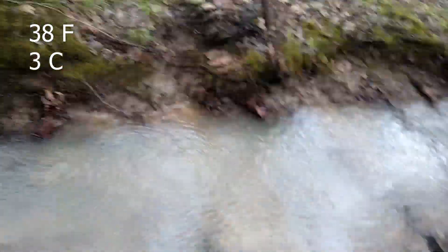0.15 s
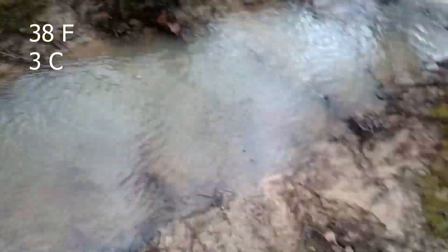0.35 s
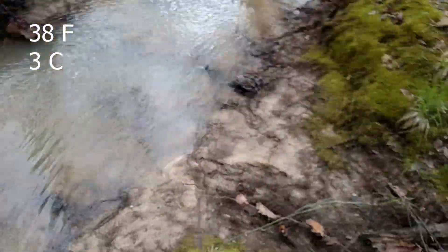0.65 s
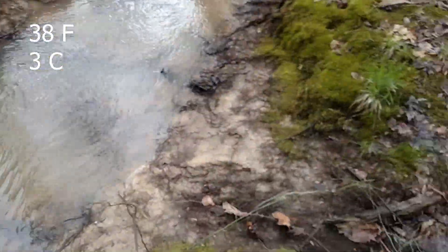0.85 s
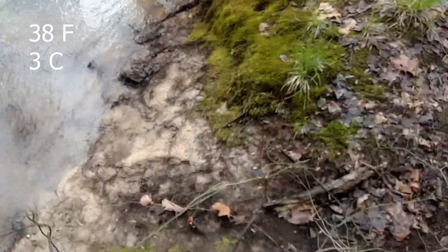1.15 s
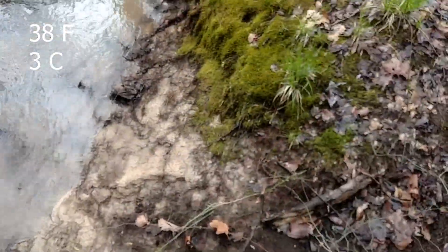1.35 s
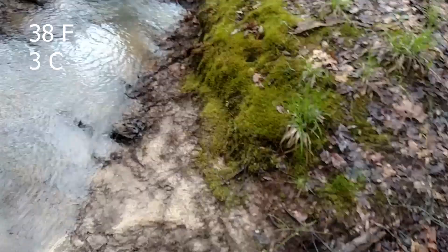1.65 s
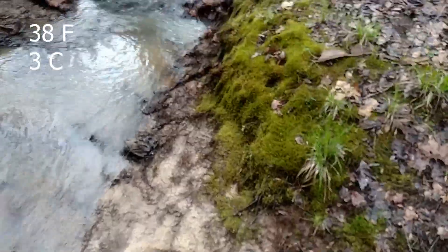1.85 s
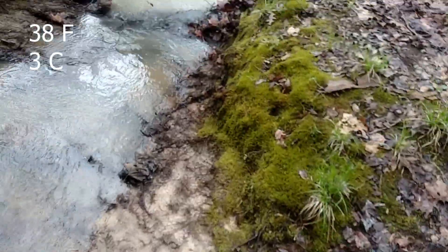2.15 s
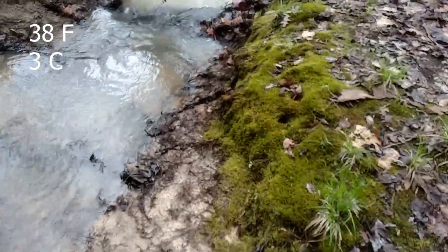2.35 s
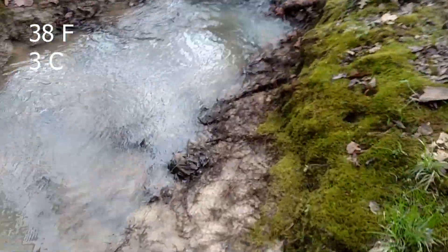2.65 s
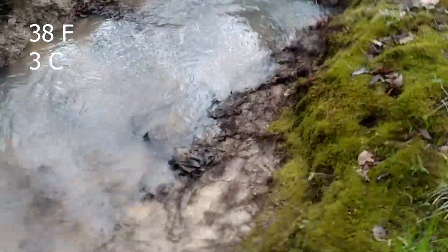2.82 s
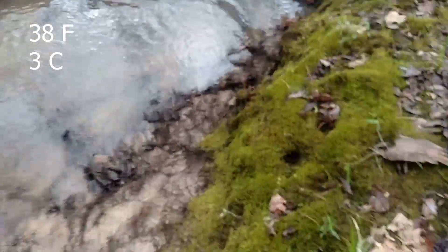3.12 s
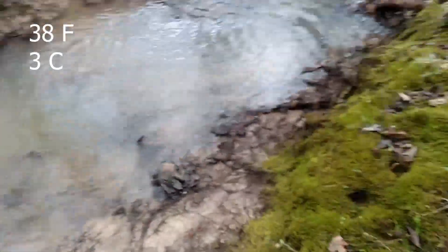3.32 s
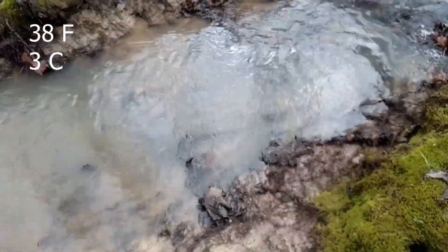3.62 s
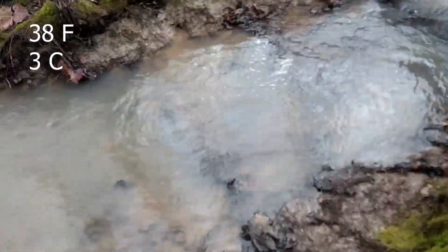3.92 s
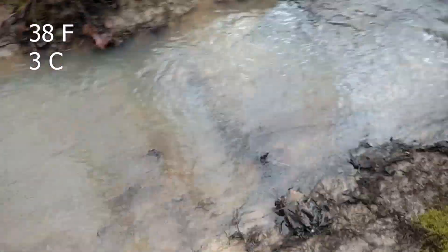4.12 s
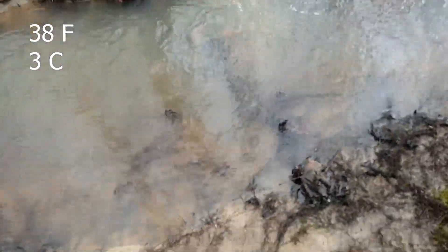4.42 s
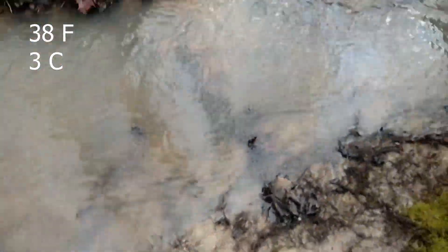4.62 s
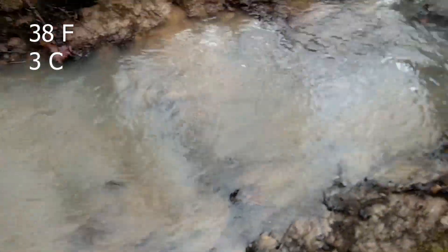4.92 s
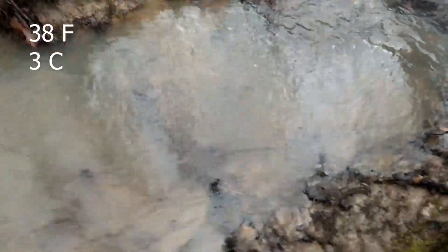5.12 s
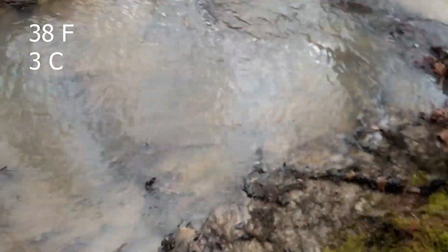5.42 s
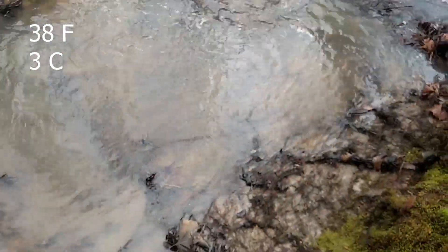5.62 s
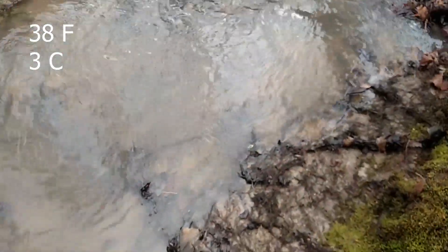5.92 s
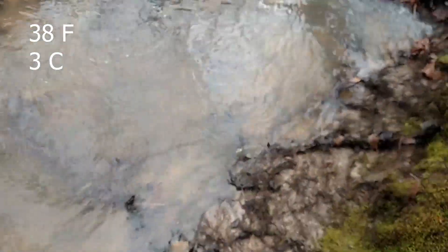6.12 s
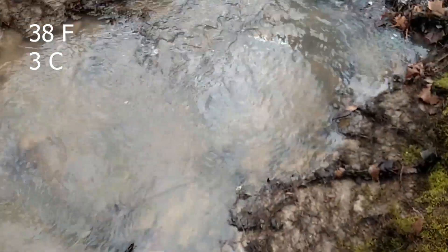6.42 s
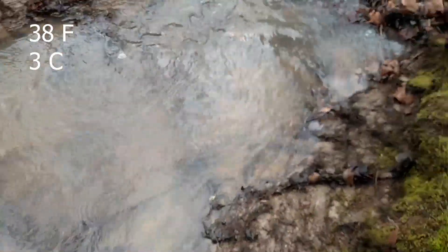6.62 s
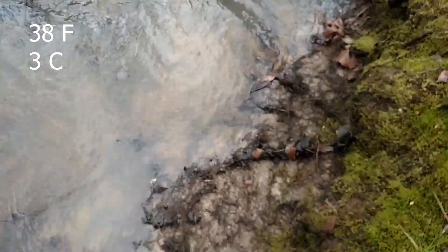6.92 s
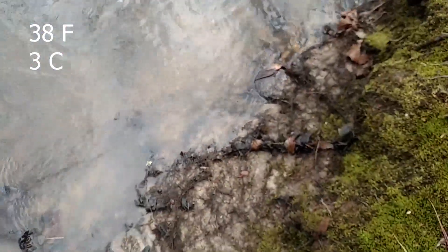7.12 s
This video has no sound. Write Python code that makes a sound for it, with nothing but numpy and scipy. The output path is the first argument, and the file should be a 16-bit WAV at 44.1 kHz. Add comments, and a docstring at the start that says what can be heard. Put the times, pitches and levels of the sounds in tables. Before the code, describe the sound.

Small stream trickling and fizzing close by, early twig cracks underfoot, low wind thuds midway, then busier plinking and spattering drops.

```python
"""A shallow creek babbles over stones: countless small ringing bubbles over a wash of flickering noise.
Nearer bubbles plink out of it, more often as the hand-held microphone leans from the leafy bank over the
water; there ticking noise bursts make more drops, and a dulled echo and moving resonances tint the stream.
Short cracks and damped knocks are twigs, grainy noise is leaves stirred and slid on underfoot.
A low noise rumbles throughout, and in the middle a few gusts thump as dull pressure pulses."""
import sys
import numpy as np
from scipy import signal
from scipy.fft import rfft, irfft
from scipy.io import wavfile
from scipy.ndimage import uniform_filter1d

SR = 44100
rng = np.random.default_rng(int(sys.argv[2]) if len(sys.argv) > 2 else 0)


def persist_wave(psi):
    """Save psi, clipped to +-1, as 16-bit WAV."""
    counts = np.round(np.clip(psi, -1, 1) * 32767).astype(np.int16)
    wavfile.write(sys.argv[1], SR, np.atleast_2d(counts).T)


N = 320166
TIME = np.arange(N) / SR  # [s]

# level of the babble and of the spray over time, before each layer's trim:
# (time [s], babble level [dB], spray level [dB])
WATER_LEVELS = [(0.0, -51.5, -66), (0.5, -52.5, -67), (1.2, -53.5, -65), (2.05, -53, -63.5),
                (2.6, -53, -64.5), (3.05, -48.5, -60), (3.8, -49.5, -61.5), (4.35, -53, -66.5),
                (5.13, -52, -64), (6.91, -51, -62), (7.26, -52, -59.5)]
# relative loudness of the small bubbles by pitch: (pitch [Hz], level [dB])
BUBBLE_LOUDNESS = [(500, -12), (800, -4.5), (1200, -2), (1800, 2.5), (2600, -3.5), (4000, 11.5), (6000, 9),
                   (9000, -1), (14000, -23)]
# near bubbles at set times, before trim: (time [s], pitch [Hz], peak level [dB])
NEAR_BUBBLES = [(1.145, 2030, -40.5), (1.269, 1460, -42.5), (1.351, 1470, -43), (1.630, 1280, -40.5),
                (1.76, 1174, -40), (1.968, 1560, -42.5), (1.992, 1770, -39), (2.112, 1760, -38),
                (2.252, 845, -41.5), (2.783, 1720, -35.5), (2.933, 2000, -36), (3.027, 1620, -30.5),
                (3.567, 1510, -40), (4.254, 2000, -39.5), (4.48, 1530, -44), (4.57, 1740, -44),
                (4.63, 2170, -46), (4.951, 1560, -35.5), (5.024, 2010, -36.5), (5.034, 2970, -35),
                (5.086, 1440, -40.5), (5.15, 1690, -43.5), (5.24, 1510, -43), (5.358, 950, -36),
                (5.391, 1320, -37), (5.45, 2510, -45.5), (5.5192, 1600, -40), (5.547, 1900, -45),
                (5.763, 1960, -38.5), (5.836, 2530, -39.5), (5.849, 1005, -42.5), (5.917, 2000, -42),
                (6.944, 2510, -37)]
# near drops at set times, before trim: (time [s], peak level [dB], centre [Hz])
NEAR_DROPS = [(1.056, -30, 1640), (1.148, -40, 2100), (1.281, -38, 2650), (1.573, -31.5, 3610),
              (2.816, -28.5, 1477), (4.524, -42, 5000), (4.824, -32.5, 3550), (5.043, -38, 4300),
              (5.044, -48, 9000), (5.209, -48, 12000), (5.239, -47, 10000), (5.255, -48, 11500),
              (5.5663, -31, 3000), (5.808, -32, 3260), (5.9255, -30, 3100), (6.024, -39, 7260),
              (6.046, -35, 5660), (6.084, -35.5, 4130), (6.1374, -31, 5600), (6.14, -31, 1540),
              (6.189, -30.5, 1510), (6.351, -45, 6100), (6.395, -37.5, 6000), (6.5765, -35, 6100),
              (6.587, -30.5, 5300), (6.741, -36, 5110)]
# colour of the blended wash of the whole stream: (frequency [Hz], level [dB per Hz])
WASH_COLOUR = [(120, -24), (200, -3.5), (394, -7.5), (635, -5), (735, -4), (1210, -3), (1840, -5),
               (2510, -3), (5730, -20), (14900, -32.5), (16000, -39)]
# the echo off the water as the microphone moves over it: (time [s], delay [ms], strength [0-1])
WATER_ECHO = [(4.3, 0.54, 0.24), (5.2, 0.66, 0.1), (5.6, 1.14, 0.26), (5.9, 1.03, 0.2), (6.7, 1.074, 0.33),
              (7.26, 1.21, 0.27)]
# a narrow band that stands out over the water: (time [s], centre [Hz], boost [0-1])
BRIGHT_BAND = [(4.6, 6700, 0.03), (5.05, 6440, 0), (5.4, 5800, 0.3), (5.7, 5750, 0.9), (6.05, 5860, 1),
               (6.3, 5400, 0), (6.8, 5330, 0.9), (7.26, 5070, 0)]
# twigs and dry leaves snapping, before trim: (time [s], peak level [dB], knock pitch [Hz],
# crack level relative to the knock [dB], splinter pitch [Hz])
TWIG_SNAPS = [(0.0307, -27.5, 875, -2.5, 6200), (0.039, -26.5, 784, -12, 2000),
              (0.1252, -28.5, 880, -8.5, 6280), (.204, -34, 1110, -9, 2500),
              (0.2231, -19.5, 974, -9.5, 7800), (0.6133, -29, 1300, 1, 3470), (.917, -33, 1400, -9, 2620),
              (1.847, -29.5, 1080, -22, 2030), (1.871, -23, 1080, -19, 1500), (4.1056, -43, 595, 0, 9400),
              (5.2885, -32.5, 960, -11, 3000), (5.2959, -32.5, 700, -5.5, 1700),
              (5.4955, -28.5, 556, -20, 2200), (5.982, -28.5, 660, -12, 2500)]
# colour of a snap's sharp crack: (frequency [Hz], level [dB])
CRACK_COLOUR = [(500, -15), (1500, 31), (3500, 1), (7000, 11), (10000, -12), (16000, -26)]
# shoes shifting in damp leaves: (middle [s], length [s], level [dB])
LEAF_SHUFFLES = [(0.013, 0.03, -38), (0.328, 0.096, -51), (0.944, 0.23, -50.5), (1.666, 0.071, -51),
                 (2.649, 0.016, -49), (2.848, 0.079, -42), (2.945, 0.053, -40), (3.129, 0.051, -43),
                 (3.87, 0.15, -52.5), (4.156, 0.021, -45), (4.67, 0.19, -51), (5.314, 0.067, -48),
                 (5.492, 0.036, -54), (6.885, 0.094, -51)]
# colour of the leaf rustle: (frequency [Hz], level [dB per Hz])
LEAF_COLOUR = [(150, -27), (350, 7.5), (800, 7.5), (1500, 4.5), (3000, -5.5), (7000, -13.5), (10000, -22.5),
               (16000, -36)]
# gusts on the microphone, before trim: (peak time [s], buffeting level [dB])
GUST_PEAKS = [(2.79, -41.5), (2.848, -32), (2.985, -34), (3.182, -43.5), (3.29, -51), (3.44, -33),
              (3.809, -38), (3.93, -42.5), (4.045, -33.5)]
# eddies striking the microphone at set times, strong and weak: (time [s], peak level [dB], centre [Hz])
SET_EDDIES = [(0.166, -34, 126), (0.288, -34.5, 128), (0.934, -33.5, 188), (1.899, -44, 224),
              (2.068, -27, 176), (2.096, -31, 180), (2.162, -38.5, 320), (2.2, -34.5, 180),
              (2.853, -10.5, 230), (2.8585, -18, 280), (2.867, -15.5, 170), (2.881, -28, 250),
              (2.895, -21, 310), (2.91, -13, 172), (3.015, -31, 141), (3.175, -34.5, 131),
              (3.194, -43, 178), (3.391, -32, 106), (3.439, -12, 164), (3.4404, -23, 315),
              (3.467, -21, 154), (3.519, -33, 169), (3.605, -39, 63.8), (3.833, -38, 85),
              (3.781, -27.5, 248), (3.992, -27.5, 160.7), (4.015, -32, 252), (4.043, -23.5, 94),
              (4.052, -27, 258), (4.064, -19.5, 130), (4.141, -32, 300), (4.174, -33.5, 128),
              (4.447, -41.5, 97), (5.229, -41, 104), (6.145, -35, 172), (6.251, -38.5, 90),
              (6.548, -39, 130)]
# colour of the buffeting in a gust: (frequency [Hz], level [dB per Hz])
GUST_COLOUR = [(12, -18), (22, 5), (55, 4), (125, 6), (310, -28), (560, -32), (800, -55), (1300, -100)]
# level of the low rumble, before trim: (time [s], level [dB])
RUMBLE_LEVEL = [(0.0, -54.5), (0.5, -51), (1.35, -59), (2.2, -53), (2.55, -52), (3.3, -62), (4.6, -53.5),
                (5.85, -57.5), (6.25, -53.5), (7.26, -55.5)]
# colour of the rumble in calm air: (frequency [Hz], level [dB per Hz])
CALM_COLOUR = [(12, -11), (20, 2.5), (38, -3), (118, -1), (176, -3.5), (212, -4.5), (370, -11.5),
               (600, -16), (780, -63), (1320, -120)]


def gain_of(db):
    """Decibels to amplitude."""
    return 10 ** (np.asarray(db) / 20)


def evened(x):
    """Scales to rms 1."""
    return x / np.sqrt(np.mean(x ** 2) + 1e-20)


def read(points, hz):
    """Reads a spectrum on a log-frequency axis."""
    f, value = np.transpose(points)
    return np.interp(np.log(hz + 1), np.log(f + 1), value)


def follow(rows, axis):
    """One column of a curve at every sample."""
    columns = np.transpose(rows)
    return np.interp(TIME, columns[0], columns[axis])


def add(mix, s, sound):
    """Mixes a sound in at time s."""
    part = mix[max(round(s * SR), 0):][:len(sound)]
    part += sound[:len(part)]


def coloured(x, spectrum):
    """Gives a signal a spectrum, at rms 1."""
    gain = gain_of(read(spectrum, np.fft.rfftfreq(len(x), 1 / SR)))
    return evened(irfft(rfft(x) * gain, len(x)))


def drift(top_hz):
    """A smooth random wander of rms 1: noise kept only below top_hz."""
    noise = rfft(rng.standard_normal(N))
    return evened(irfft(noise * (np.fft.rfftfreq(N, 1 / SR) < top_hz), N))


def moments(per_s):
    """Random events at a changing rate: rows of (time [s], two chance values [0-1])."""
    due = np.cumsum(per_s * np.ones(N)) / SR  # events expected so far
    when, one, other = rng.random((int(due[-1]), 3)).T
    return zip(np.interp(when * due[-1], due, TIME), one, other)


def leaning(middle_s=4.7, takes_s=0.38):
    """How far the microphone is out over the water, 0 to 1, on a smooth S-curve."""
    return 0.5 + 0.5 * np.tanh((TIME - middle_s) / takes_s)


def bubble(hz, t60, rise):
    """A trapped air pocket rings and dies; a positive rise lifts its pitch as it nears the surface."""
    t = np.arange(int(t60 * SR) + 8) / SR
    turns = hz * (t + rise * t ** 2 / (2 * t60))
    attack = 1 - np.exp(-t * hz)
    decay = gain_of(-60 * (t / t60) ** 1.56)
    return np.sin(2 * np.pi * turns) * attack * decay


def swarm(lo_hz, hi_hz, per_s, cycles, spread_db, rise, count=48):
    """Bubbles of many sizes burst in clusters as wavelets fold over; most are faint, a few loud."""
    pitches = np.geomspace(lo_hz, hi_hz, count)
    rings = [bubble(hz, cycles / hz * rng.uniform(0.58, 2.16), rise * rng.uniform(-0.23, 1.55))
             for hz in pitches]
    # a wandering rate clusters the bursts
    due = np.cumsum(gain_of(3.5 * drift(14))) * per_s / SR
    when, kind, luck = rng.random((int(due[-1]), 3)).T
    starts = np.searchsorted(due, when * due[-1])
    kinds = (kind * count).astype(int)
    lucky_db = spread_db * np.minimum(-np.log(1 - luck), 3.8)
    sizes = gain_of(read(BUBBLE_LOUDNESS, pitches)[kinds] + lucky_db)
    out = np.zeros(N + SR)
    for i, k, size in zip(starts.tolist(), kinds.tolist(), sizes.tolist()):
        out[i:i + len(rings[k])] += size * rings[k]
    return out[:N] / np.std(out[:N])


def babble(gurgle_db=-3.5, trickle_db=-13.5, fizz_db=0.0, bank_db=-2.0):
    """Large bubbles gurgle, middling ones trickle, tiny ones fizz; all are softer from the bank."""
    gurgle = swarm(lo_hz=607.2, hi_hz=2306, per_s=850, cycles=24.5, spread_db=5.5, rise=0.14)
    trickle = swarm(lo_hz=1409, hi_hz=3317, per_s=450, cycles=34, spread_db=8.5, rise=0.22)
    fizz = swarm(lo_hz=3236, hi_hz=12750, per_s=1400, cycles=19.6, spread_db=5.0, rise=0.084)
    body = gain_of(gurgle_db) * gurgle + gain_of(trickle_db) * trickle
    body = body * gain_of(follow(WATER_LEVELS, axis=1))
    fizz = fizz * gain_of(follow(WATER_LEVELS, axis=2) + fizz_db)
    return (body + fizz) * gain_of(bank_db * (1 - leaning()))


def burble(middle_s=1.74, length_s=1.18, level_db=-56.5):
    """For a while one ripple sheds a run of bubbles of nearly one size."""
    run = swarm(lo_hz=1137, hi_hz=1756, per_s=310, cycles=53, spread_db=2.0, rise=0.13, count=16)
    swell = np.exp(-(2 * (TIME - middle_s) / length_s) ** 4)
    return run * gain_of(level_db) * swell


def random_bubbles(bank_per_s=6.0, water_per_s=20.0, lo_hz=1200, hi_hz=4000,
                   top_db=-45.0, nearer_db=3.5, range_db=13.5):
    """More near bubbles at random times, most over the water: rows of (time [s], pitch [Hz], level [dB])."""
    lean = leaning()
    rows = []
    for s, size, depth in moments(bank_per_s + (water_per_s - bank_per_s) * lean):
        db = top_db + nearer_db * np.interp(s, TIME, lean) - range_db * depth
        rows.append((s, lo_hz * (hi_hz / lo_hz) ** size, db))
    return rows


def gurgles(per_s=4.0, lo_hz=1000, hi_hz=3200, top_db=-41.0, range_db=17.0,
            gap_s=0.017, step_octaves=0.25, fade_db=3.8, count=4):
    """Air pockets break into quick chains of fading bubbles: rows of (time [s], pitch [Hz], level [dB])."""
    rows = []
    for s, size, depth in moments(per_s * leaning()):
        times = s + np.cumsum(gap_s * (0.5 + rng.random(count)))
        steps = np.cumsum(step_octaves * rng.standard_normal(count))
        pitches = lo_hz * (hi_hz / lo_hz) ** size * 2 ** steps
        rows += zip(times, pitches, top_db - range_db * depth - fade_db * np.arange(count))
    return rows


def plinks(level_db=1.5, rise=0.25, start=0.97, pinch_db=-1.0, pinch_s=0.00062, rough=0.26,
           longest_cycles=42.4):
    """Near bubbles tick as they pinch off, then ring from just under pitch, shaken by the current."""
    out, t = np.zeros(N), np.arange(512) / SR
    shake = 1 + rough * drift(260)
    for s, hz, db in NEAR_BUBBLES + random_bubbles() + gurgles():
        # (frequency [Hz], level [dB])
        colour = [(hz / 2, -6), (hz, 0), (hz * 2, -7), (hz * 8, -42)]
        tick = coloured(rng.standard_normal(len(t)), colour)
        tick = tick * (1 - np.exp(-t * hz * 6)) * np.exp(-t / pinch_s)
        add(out, s, gain_of(db + pinch_db) * tick)
        # a fixed range of cycles to fall 60 dB, so large bubbles ring longer
        t60 = longest_cycles / hz * rng.uniform(0.83, 1.0)
        ring = bubble(hz * start, t60, rise * rng.uniform(-0.18, 1.84))
        add(out, s, gain_of(db + level_db) * ring)
    return out * shake


def smack(hz, decay_s, attack_s=0.0004, skirt_db=-28.0):
    """A sudden impact: a quick, very short burst of noise around one pitch."""
    t = np.arange(1024) / SR
    # (frequency [Hz], level [dB])
    colour = [(hz / 4, 2 * skirt_db), (hz / 2, skirt_db), (hz, 0), (hz * 2, skirt_db), (hz * 4, 2 * skirt_db)]
    burst = coloured(rng.standard_normal(len(t)), colour)
    return burst * (1 - np.exp(-t / attack_s)) * np.exp(-t / decay_s)


def random_drops(per_s=40.0, lo_hz=1500, hi_hz=11000, top_db=-33.5, range_db=10.0, db_per_octave=-4.5):
    """More drops at random times, over the water: rows of (time [s], peak level [dB], centre [Hz])."""
    octaves = np.log2(hi_hz / lo_hz)
    rows = []
    for s, size, depth in moments(per_s * leaning()):
        db = top_db - range_db * depth + db_per_octave * size * octaves
        rows.append((s, db, lo_hz * 2 ** (size * octaves)))
    return rows


def spatter(level_db=-4.5):
    """Near drops smack the surface one by one, each a short burst of noise."""
    out = np.zeros(N)
    for s, db, hz in NEAR_DROPS + random_drops():
        add(out, s, gain_of(db + level_db) * smack(hz, decay_s=0.0022))
    return out


def droplets(per_s=150, spread_db=5.5, level_db=-1.0, lo_hz=3300, hi_hz=11000, db_per_octave=-7.5, count=24):
    """Small flung droplets tick on the surface at many pitches, the higher ones fainter."""
    out = np.zeros(N)
    pitches = np.geomspace(lo_hz, hi_hz, count)
    ticks = [smack(hz, decay_s=0.002) * gain_of(db_per_octave * np.log2(hz / lo_hz)) for hz in pitches]
    for s, kind, luck in moments(per_s):
        lucky_db = spread_db * min(-np.log(1 - luck), 3)
        add(out, s, ticks[int(kind * count)] * gain_of(lucky_db))
    return evened(out) * gain_of(follow(WATER_LEVELS, axis=2) + level_db)


def wash(level_db=-4.5, spray_db=-2.5, patchy_db=3.0, flicker_db=2.5, far_db=-71.0):
    """Distant ripples blend into a hiss that flickers in patches, over the even fizz of farther water."""
    hz = np.fft.rfftfreq(512, 1 / SR)
    real, imaginary, patches = rng.standard_normal((3, N // 128 + 5, len(hz)))
    # smoothed over time, then over frequency
    patches = uniform_filter1d(patches, size=6, axis=0)
    patches = evened(uniform_filter1d(patches, size=7, axis=1))
    flicker = evened(uniform_filter1d(rng.standard_normal(len(real)), size=5))[:, None]
    level = read(WASH_COLOUR, hz) + patchy_db * patches + flicker_db * flicker
    frames = (real + 1j * imaginary) * gain_of(level)
    high = 1 / (1 + (3500 / (hz + 1)) ** 4)  # share of the spray; the body takes the rest
    body, spray = (evened(signal.istft((frames * share).T, nperseg=512, noverlap=384)[1][:N])
                   for share in (1 - high, high))
    # (frequency [Hz], level [dB per Hz])
    far_colour = [(300, -8), (3500, -4.5), (6500, 1.0), (10000, -10.0), (15500, -17)]
    far = coloured(rng.standard_normal(N), far_colour)
    body = body * gain_of(follow(WATER_LEVELS, axis=1) + level_db)
    spray = spray * gain_of(follow(WATER_LEVELS, axis=2) + spray_db)
    return body + spray + gain_of(far_db) * far


def resonate(x, hz, width):
    """A resonance of gain 1 that follows the curve hz: shift down, smooth, shift back."""
    turn = np.exp(2j * np.pi * np.cumsum(hz) / SR)
    r = np.exp(-np.pi * width / SR)
    return 2 * (turn * signal.lfilter([1 - r], [1, -r], x / turn + 1e-18)).real


def mirrored(x, dull_hz=3300, sheen_width_hz=560, hollow_ratio=1.16, hollow_width_hz=800, hollow=0.73):
    """The rippled surface adds a dulled echo; a bright band and a hollow just above it move in pitch."""
    dulled = irfft(rfft(x) / (1 + (np.fft.rfftfreq(N, 1 / SR) / dull_hz) ** 4), N)
    echo = np.interp(TIME - follow(WATER_ECHO, axis=1) / 1000, TIME, dulled)
    hz, boost = follow(BRIGHT_BAND, axis=1), follow(BRIGHT_BAND, axis=2)
    bright = x + boost * resonate(x, hz, sheen_width_hz)
    dip = hollow * boost * resonate(bright, hz * hollow_ratio, hollow_width_hz)
    return bright - dip + follow(WATER_ECHO, axis=2) * echo


def snaps(knock_s=0.00088, crack_s=0.0012, crack_db=3.0, knock_db=3.5, overtone=0.16,
          lowest_hz=440, splinter_db=-5.0):
    """A twig gives way: a brief crack, the sharp tick of a splinter and a damped woody knock."""
    out, t = np.zeros(N), np.arange(1024) / SR
    for s, db, hz, bright_db, splinter_hz in TWIG_SNAPS:
        splinter = smack(splinter_hz, decay_s=0.0014, attack_s=0.0001)
        add(out, s, gain_of(db + bright_db + splinter_db) * splinter)
        knock = np.sin(2 * np.pi * hz * t) - overtone * np.sin(2 * np.pi * hz * 1.5 * t)
        knock = knock * np.exp(-t / knock_s)
        crack = coloured(rng.standard_normal(len(t)), CRACK_COLOUR) * np.exp(-t / crack_s)
        add(out, s, gain_of(db) * (gain_of(knock_db) * knock + gain_of(bright_db + crack_db) * crack))
    return signal.sosfilt(signal.butter(2, lowest_hz, "highpass", fs=SR, output="sos"), out)


def shuffles(grain_db=3.5):
    """Damp leaves crush in clumped grains under a shifting foot."""
    pressure = sum(gain_of(db) * np.exp(-(2 * (TIME - s) / length) ** 2) for s, length, db in LEAF_SHUFFLES)
    grains = rng.standard_normal(N) * gain_of(grain_db * drift(250))
    return pressure * coloured(grains, LEAF_COLOUR)


def swish(middle_s=2.273, length_s=0.26, level_db=-50.0, grain_db=1.5):
    """A sole slides over wet leaves: one dense, bright swell."""
    grains = rng.standard_normal(N) * gain_of(grain_db * drift(230))
    # (frequency [Hz], level [dB per Hz])
    colour = [(400, -6.5), (1300, 4.5), (2800, -4), (6000, -7.5), (8000, -13), (11000, -26), (16000, -29)]
    swell = np.exp(-(2 * (TIME - middle_s) / length_s) ** 2)
    return gain_of(level_db) * swell * coloured(grains, colour)


def gusting(rise_s=0.033, fall_s=0.045):
    """The strength of the gusts: each swells to its peak and dies away exponentially."""
    return sum(gain_of(db) * np.exp(-np.maximum((s - TIME) / rise_s, (TIME - s) / fall_s))
               for s, db in GUST_PEAKS)


def random_eddies(per_s=35.0, over_db=5.0, range_db=3.0, lo_hz=90, hi_hz=240):
    """More eddies at random times within the gusts: rows of (time [s], peak level [dB], centre [Hz])."""
    gust_db = 20 * np.log10(gusting() + 1e-9)
    rows = []
    for s, size, miss in moments(per_s * (gust_db > -55)):
        db = np.interp(s, TIME, gust_db) + over_db - range_db * miss
        rows.append((s, db, lo_hz + (hi_hz - lo_hz) * size))
    return rows


def puffs(wake=0.18, wake_s=0.0083, rebound=0.77):
    """Each eddy is one dull pressure dip and its rebound, trailed by a short turbulent wake."""
    out, t = np.zeros(N), np.arange(-1024, 3072) / SR
    # (frequency [Hz], level [dB per Hz])
    wake_colour = [(30, -27), (130, 15.0), (380, -11.0), (600, -25.5), (1500, -63)]
    for s, db, hz in SET_EDDIES + random_eddies():
        u = (np.pi * hz * t) ** 2
        dip = (2 * u - 1 + rebound * np.pi * hz * t) * np.exp(-u)
        swirl = coloured(rng.standard_normal(len(t)), wake_colour)
        trail = np.maximum(t, 0) / wake_s
        add(out, s + t[0], gain_of(db) * (dip + wake * swirl * trail * np.exp(1 - trail)))
    return out


def breeze(calm_db=-1.5, gust_db=2.0, lumpy_db=5.0):
    """A faint lumpy outdoor rumble, and deeper buffeting in the gusts."""
    lumps = gain_of(lumpy_db * np.tanh(drift(16)))
    calm = coloured(rng.standard_normal(N) * lumps, CALM_COLOUR)
    gust = coloured(rng.standard_normal(N), GUST_COLOUR)
    return gain_of(calm_db + follow(RUMBLE_LEVEL, axis=1)) * calm + gain_of(gust_db) * gusting() * gust


def banks(x, wet_db=-17.0, t60=0.26):
    """The banks and the water surface scatter a short, faint echo of sparse random taps."""
    t = np.arange(SR // 4) / SR
    sparse = rng.random(len(t)) < 2000 / SR  # about 2000 taps a second
    taps = rng.standard_normal(len(t)) * sparse * (t > 0.003) * gain_of(-60 * t / t60)
    return x + gain_of(wet_db) * signal.fftconvolve(x, taps / np.linalg.norm(taps))[:N]


def scene():
    """Water and leaves between the banks, with air on the microphone."""
    water = mirrored(wash() + banks(babble() + droplets()))
    near = banks(plinks() + spatter() + snaps() + burble())
    underfoot = shuffles() + swish()
    air = breeze() + puffs()
    return (water + near + underfoot + air)[None]


def record(dry, edge_hz=15750):
    """The recorder's band limit: a steep lowpass."""
    lowpass = signal.firwin(401, edge_hz, window=("kaiser", 8), fs=SR)
    return signal.oaconvolve(dry, lowpass[None], "same")


dry = scene()
out = record(dry)
persist_wave(out)
```